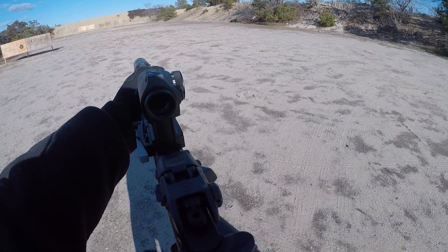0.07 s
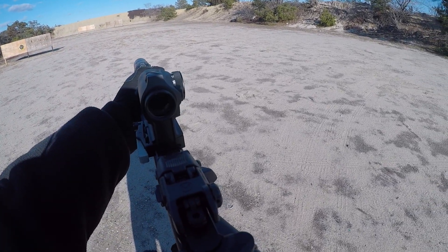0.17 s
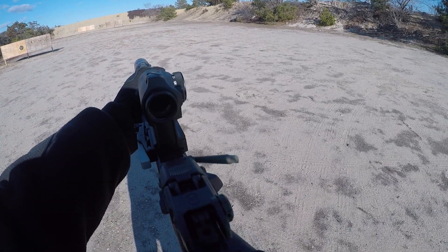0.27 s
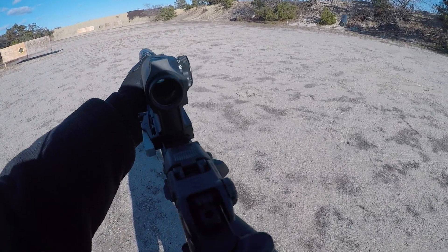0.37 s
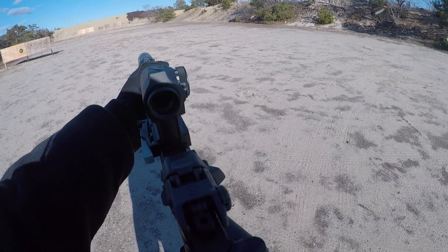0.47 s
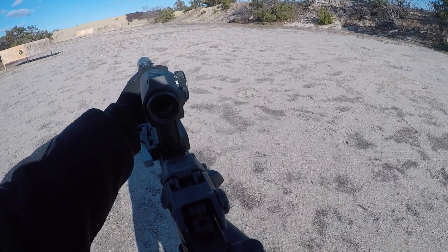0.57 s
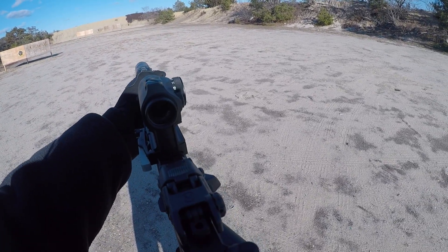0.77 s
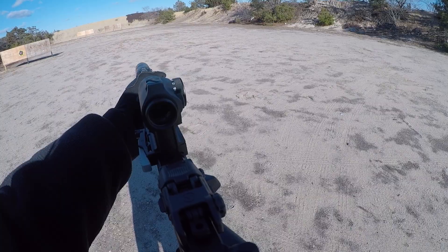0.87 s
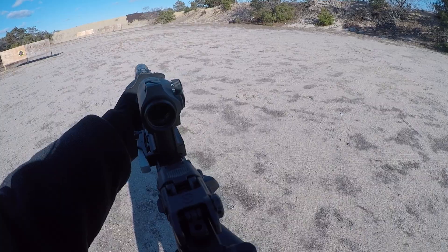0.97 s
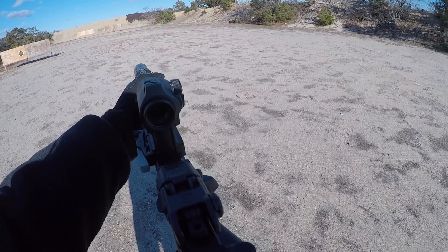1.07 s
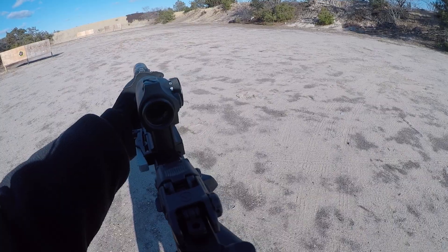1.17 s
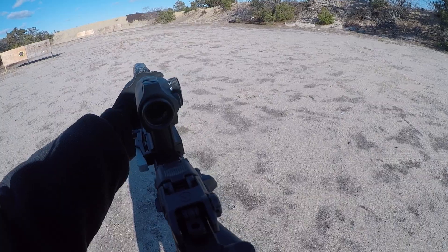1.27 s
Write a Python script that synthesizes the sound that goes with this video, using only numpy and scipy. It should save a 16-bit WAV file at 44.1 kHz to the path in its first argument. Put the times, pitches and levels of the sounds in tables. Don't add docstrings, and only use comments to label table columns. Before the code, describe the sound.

A suppressed rifle fires once close to a head-worn stereo microphone, puffing and clacking; a hiss returns from the berms, then a click and bright steel ring fade over an open, windy gravel range.

```python
import sys
import numpy as np
from scipy import signal
from scipy.fft import rfft, irfft, next_fast_len
from scipy.io import wavfile
from scipy.ndimage import map_coordinates

SR = 44100
rng = np.random.default_rng(int(sys.argv[2]) if len(sys.argv) > 2 else 0)


def ratio(d):
    e = np.asarray(d, float) / 20
    return 10 ** e


def file_out(sig):
    cols = np.atleast_2d(sig).T
    lim = np.clip(cols, -1, 1)
    pcm = np.round(lim * 32767).astype(np.int16)
    wavfile.write(sys.argv[1], SR, pcm)


N = 57330

# frequency_hz, lead_rad
PORT_LEAD = [(0, 0), (1810, -0.8), (7750, 1.6), (9300, 7.8), (12300, 11.0), (12700, 14.4), (15200, 15.5)]


def unit(x):
    return x / np.sqrt(np.mean(x ** 2) + 1e-20)


def along(points, hz):
    f, v = np.transpose(points)
    return np.interp(np.log(hz + 1), np.log(f + 1), v)


def curves(rows):
    s, *cols = np.transpose(rows)
    return [np.interp(np.arange(N) / SR, s, c) for c in cols]


def wobble(rate):
    knots = rng.standard_normal(int(N / SR * 60) + 4)
    return map_coordinates(knots, [np.arange(N) * min(rate, 60) / SR])


def filtered(x, response):
    m = next_fast_len(N + SR // 2)
    spectrum = rfft(x, m) * response(np.fft.rfftfreq(m, 1 / SR))
    return irfft(spectrum, m)[..., :N]


def sides(db):
    return ratio(np.array([db / 2, -db / 2])).reshape(2, -1)


def rush(spectrum, alike):
    def port_phase(hz):
        return np.exp(.5j * along(PORT_LEAD, hz) * np.array([[1], [-1]]))

    noise = rng.standard_normal((3, N))
    share = np.clip(alike, 0, 1)
    shared = filtered(noise[[0, 0]], port_phase)
    pair = np.sqrt(share) * shared + np.sqrt(1 - share) * noise[1:]
    return unit(filtered(pair, lambda hz: ratio(along(spectrum, hz))))


def swell(s, rise, t60):
    t = np.arange(N) / SR - s
    return np.where(t < 0, np.exp(-(t / rise) ** 2), ratio(-60 * np.abs(t) / t60))


def packet(s, db, hz, length, turn=0):
    t = np.arange(N) / SR - s
    return ratio(db) * np.exp(-(t / length) ** 2) * np.cos(2 * np.pi * (hz * t + turn))


def swells(rows):
    return sum(ratio(db) * swell(s, rise, t60) for s, db, rise, t60 in rows)


def bursts(rows, spectrum, alike):
    gate = sum(ratio(db) * swell(s, rise, t60) * sides(pan) for s, db, rise, t60, pan in rows)
    return gate * rush(spectrum, alike)


def wind():
    # time_s, buffet_db, left_over_right_db
    gusts = [(0.0, -35.5, 6.5), (0.144, -41, -2), (0.176, -45, 18.5), (0.266, -38, -8),
             (0.322, -50.5, -0.5), (0.546, -47, 2), (0.618, -41, 11.5), (.72, -44.5, 9), (1.024, -55, 9.5),
             (1.168, -47, 4), (1.3, -43, 17)]
    # time_s, level_db
    hiss_levels = [(0, -50), (.2, -49), (.35, -63), (.8, -59), (1.05, -61.5), (1.3, -59.5)]
    # frequency_hz, density_db
    buffet_spectrum = [(12, -28.5), (25, -3), (50, 0), (129, -6.5), (193, -14.5), (278, -23.5),
                       (400, -27.5), (600, -67)]
    hiss_spectrum = [(150, -29.5), (250, -2.5), (652, -3.5), (711, -6.5), (1070, -7.5), (2750, -21.5),
                     (5190, -25), (8670, -20.5), (15000, -40.5)]
    buffet_db, pan_db = curves(gusts)
    hiss_db, = curves(hiss_levels)
    lumps = ratio(4.7 * np.array([wobble(4.3), wobble(6.3)]))
    buffet = unit(lumps * rush(buffet_spectrum, alike=0.15))
    hiss = ratio(hiss_db + wobble(23)) * rush(hiss_spectrum, alike=0.067) * sides(0.59)
    return ratio(buffet_db + 3.5) * sides(pan_db) * buffet + hiss


def gas_spits():
    # peak_s, level_db, rise_s, t60_s, left_over_right_db
    spits = [(.224, -37.5, 0.00066, 0.041, -1), (.229, -46.5, .001, 0.012, 0),
             (.234, -39, 0.00079, 0.073, 4.5), (0.2468, -26, 0.0015, 0.062, -3),
             (.257, -23.5, 0.0019, 0.04, 1.5), (.262, -17.5, 0.0024, 0.016, 2.5),
             (.2668, -3, 0.0005, 0.016, -2.5), (.277, -20.5, 0.0046, .012, -5),
             (.287, -34, .001, .02, -1.5), (0.57, -22.5, 0.0005, 0.04, 1.5), (1.289, -47, 0.001, .02, -2),
             (1.298, -47, 0.0011, 0.021, 9)]
    # frequency_hz, density_db
    spit_spectrum = [(530, -30.5), (900, -3.5), (1800, -11.5), (3000, -6.5), (3300, -7), (4940, -14),
                     (7500, -5.5), (10200, -28), (15500, -38)]
    return bursts(spits, spit_spectrum, 0.41)


def suppressor_puffs():
    # late_s, peak_db, length_s
    puffs = [
        (-.0004, -22.5, .0015),
        (-.0001, -11, 0.0012),
        (.0002, -4.5, .0016),
        (-.0006, -2.5, 0.0012),
    ]
    first_s, gap_s = .2365, .01043
    tube_hz, start_turn, turn_per_puff = 735, 0.072, .32
    port_lag_s = np.array([[.00006], [0]])
    out = np.zeros((2, N))
    for k, (late, db, length) in enumerate(puffs):
        turn = start_turn + k * turn_per_puff + tube_hz * late
        out += packet(first_s + k * gap_s + late + port_lag_s, db, tube_hz, length, turn)
    return out


def body_knocks():
    # time_s, peak_db, pitch_hz, length_s, left_over_right_db
    knocks = [(.2488, -21, 140, 0.0072, 7), (.2557, -20, 149, .003, 19.5), (.2627, -11, 145, 0.0036, 6),
              (.269, -19.5, 228, 0.0025, -11.5), (.2748, -17, 130, 0.006, 8.5),
              (0.327, -39, 280, 0.0034, 1), (.4075, -33.5, 260, 0.0014, 3), (.4165, -32, 193, 0.0051, 3.5),
              (.5718, -31.5, 236, 0.0016, 12), (1.2749, -27.5, 172.3, 0.0043, 12.5),
              (1.2933, -29, 132.3, 0.01, 26.5)]
    nudges = [(.686, -32, 414, 0.0012, 3), (.7335, -39, 149, 0.0049, 17), (.747, -40, 177, 0.0022, 14),
              (.7545, -38, 197, 0.0019, 9), (.762, -39, 196, 0.0029, 20), (.782, -41, 194, 0.0082, 7)]
    pulls = [(0.2567, -20, 169, 0.0035, 7), (0.2761, -23.5, 199, 0.0014, 8),
             (.574, -21.5, 189, 0.0026, 2.5), (0.6873, -28.5, 217, 0.0021, 6.5),
             (.7503, -42.5, 168, 0.0048, 12.5)]
    out = np.zeros((2, N))
    for rows, push, right_s in ((knocks, 1, 0.0003), (nudges, 1, -0.00031), (pulls, -1, 0)):
        for s, db, hz, length, pan in rows:
            arrival = s + right_s * np.array([[0], [1]])
            out += push * packet(arrival, db, hz, length) * sides(pan)
    return out


def short_pops():
    # time_s, peak_db, pitch_hz, length_s
    pops = [(.254, -20.5, 590, .0006), (.2554, -20, 520, .002), (.2652, -19.5, 520, 0.0015),
            (.2668, -24.5, 17000, .0004), (.2684, -14, 6200, 0.00096), (.3238, -27, 7300, 0.00039),
            (.3236, -48, 14000, .0005), (.6864, -31, 1450, 0.00051), (.67, -42, 3600, 0.0052),
            (.5597, -26, 5700, .0006), (0.27, -21.5, 12100, 0.00065), (0.47, -51, 16000, 0.00035),
            (.6862, -35.5, 3700, 0.00067), (.2672, -11.5, 2700, 0.00073), (0.325, -23, 3820, 0.00055),
            (.5596, -18, 3960, 0.00086), (.561, -35, 1750, 0.006), (.5708, -12.5, 2110, 0.00064),
            (.5718, -18.5, 563, 0.0017), (1.2995, -36, 710, 0.0026)]
    return sum(packet(*row) for row in pops)


def berm_echoes():
    # peak_s, level_db, rise_s, t60_s
    returns = [
        (0.301, -46.5, 0.0035, 0.38),
        (.425, -43.5, 0.044, 1),
        (0.501, -51.5, 0.0075, 0.89),
        (.885, -68.5, 0.019, 0.44),
    ]
    # frequency_hz, density_db
    berm_spectrum = [(250, -40.5), (400, -13.5), (1100, -11), (3200, -4.5), (5000, -10.5), (7050, -1.5),
                     (9500, -19), (15000, -38.5)]
    return swells(returns) * ratio(1.5 * wobble(45)) * rush(berm_spectrum, alike=0.053) * sides(-1.3)


def action_clicks():
    # peak_s, level_db, rise_s, t60_s, left_over_right_db
    clicks = [(.3175, -35.5, 0.0048, 0.016, -4.5), (.3235, -22, 0.0009, 0.0089, 1),
              (.333, -37.5, 0.0038, .04, -3.5), (.5592, -15.5, 0.00058, 0.013, -2.5),
              (1.053, -55.5, 0.0008, 0.022, -9.5)]
    # frequency_hz, density_db
    click_spectrum = [(530, -38.5), (900, -15.5), (3100, -10.5), (3800, -8.5), (5200, -8), (7400, 1),
                      (9000, -16.5), (13500, -26.5), (15500, -36)]
    return bursts(clicks, click_spectrum, 0.83)


def steel():
    # time_s, level_db, rise_s
    blows = [
        (0.571, 0.5, 0.0011),
        (.705, -28, .008),
        (0.886, -0.5, 0.0085),
    ]
    main_hz = [5770, 6150, 6553, 6818, 7130, 7417, 7493, 7642, 7802, 7924, 8283, 8481, 8664, 8859]
    low_hz = [1771, 2051, 3494, 4422, 5223, 5361]
    high_hz = [8946, 9392, 9639, 10019, 10310, 10600, 11298, 11675, 11996, 12315, 12474, 12700, 12783,
               13035]
    top_hz = [13424, 13705, 13983, 14420]
    # peak_db, t60_s, twin_above_hz, left_over_right_db, last_blow_peak_db
    main_modes = [(-46, 0.38, 8, 0, -80), (-40, 0.44, 9, 4, -66.5), (-38, 0.29, 9, -1, -80),
                  (-37.5, 0.49, 6.3, -8, -61), (-22.5, 0.37, 12, -4.5, -55), (-28, 0.24, 4.75, -11.5, -54),
                  (-41, 0.28, 9, -6, -70), (-33.5, 0.34, 19, -11, -64), (-34, 0.26, 4.83, -15, -73),
                  (-33, 0.49, 3.8, -7.5, -57), (-40, .3, 4.8, -10, -67.5), (-48, 0.465, 5.4, -3, -69),
                  (-58, 0.35, 10, -6, -73), (-54, 0.38, 4.93, 4, -79)]
    low_modes = [(-47.5, 0.4, 2, 14, -77), (-46, 0.43, 4, 6, -69.5), (-47.5, 0.67, 5.98, 0.5, -72),
                 (-45.5, 0.56, 8.1, -5, -63), (-43.5, 0.53, 6, 2, -65), (-60, 0.66, 4.3, -1.5, -69.5)]
    high_modes = [(-60, 0.16, 8.5, -2, -77), (-62, 0.2, 5.5, -3.5, -83), (-43.5, 0.55, 3, -4.5, -82),
                  (-53, 0.91, 3.6, -8, -81), (-46.5, 0.27, 4.6, -10.5, -69), (-52.5, .5, 11, 5, -77),
                  (-44, 0.75, 1.4, 4, -78), (-53.5, 0.33, 5, 0, -82), (-47, 0.33, 4, 3, -81),
                  (-54, .18, 5, 6.5, -88), (-57, 0.302, 10, 9, -82), (-48, 0.58, 9, -1, -86),
                  (-55, 0.302, 11.3, 8, -86), (-51, 0.34, 12, 17, -90)]
    top_modes = [(-54, .17, 9.2, 10, -86), (-56, .15, 8, 5, -88), (-54.5, .3, 5, -7, -98),
                 (-59, 0.26, 5, 4, -110)]
    pitches = main_hz + low_hz + high_hz + top_hz
    modes = main_modes + low_modes + high_modes + top_modes
    twin_gain = 0.39 * sides(4)
    t = np.arange(N) / SR
    out = np.zeros((2, N))
    for hz, (level, t60, split, pan, last) in zip(pitches, modes):
        waver = ratio(2 * wobble(35)) * sides(pan)
        lead = along(PORT_LEAD, hz) * np.array([[.5], [-.5]])
        for (s, db, rise), strength in zip(blows, (level, level, last)):
            u = t[:N - round(s * SR)]
            phase = 2 * np.pi * (hz * u + rng.random()) + lead
            pair = np.sin(phase) + twin_gain * np.sin(phase + 2 * np.pi * split * u)
            envelope = ratio(strength + db - 60 * u / t60) * (1 - np.exp(-u / rise))
            out[:, -len(u):] += envelope * pair * waver[:, -len(u):]
    return out


def rattle_wash():
    # peak_s, level_db, rise_s, t60_s
    rattles = [
        (.59, -35.5, 0.027, 0.36),
        (.67, -46, 0.053, 0.25),
        (.74, -57, 0.0092, 0.062),
    ]
    # frequency_hz, density_db
    wash_spectrum = [(400, -12), (1000, -5), (1900, -1.5), (3000, -3.5), (4600, -5.5), (7500, 3),
                     (9200, -8.5), (14500, -35.5)]
    return swells(rattles) * ratio(1.6 * wobble(55)) * rush(wash_spectrum, alike=0.55)


def cloth_scuffs():
    # peak_s, level_db, rise_s, t60_s, left_over_right_db
    scuffs = [(.686, -30.5, 0.00029, 0.016, 5.5), (.735, -56.5, 0.009, 0.029, -20),
              (.872, -57, 0.018, 0.07, -16.5), (.905, -56, 0.013, 0.12, -16.5),
              (1.152, -59.5, 0.013, 0.031, -11.5), (1.236, -55.5, 0.0036, 0.039, -3)]
    # frequency_hz, density_db
    scuff_spectrum = [(290, -11), (500, -20), (801, -11.5), (2890, -22), (7150, -69), (9000, -40),
                      (11700, -33), (19800, -120)]
    return bursts(scuffs, scuff_spectrum, 0.084)


def scene():
    rifle = gas_spits() + suppressor_puffs() + body_knocks() + short_pops() + action_clicks()
    return wind() + rifle + berm_echoes() + steel() + rattle_wash() + cloth_scuffs()


def roll_off(x):
    return signal.sosfilt(signal.butter(12, 15670, fs=SR, output="sos"), x)


def record(dry):
    x = filtered(dry, lambda hz: hz < 15700)
    mix = x / (1 + np.abs(x) ** 8) ** (1 / 8)
    return roll_off(mix)


dry = scene()
out = record(dry)
file_out(out)
```